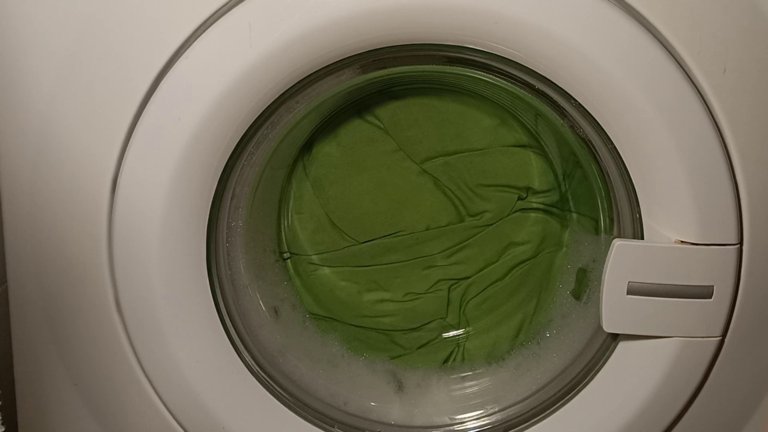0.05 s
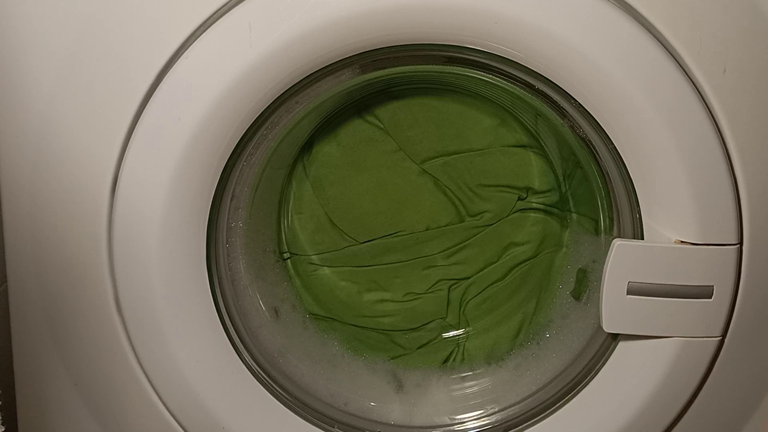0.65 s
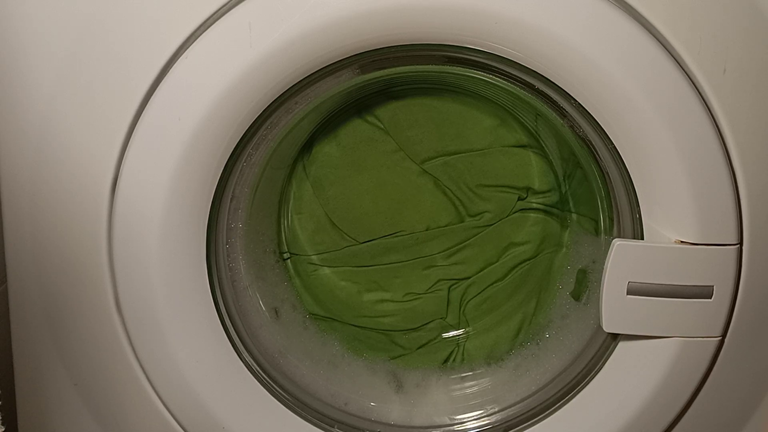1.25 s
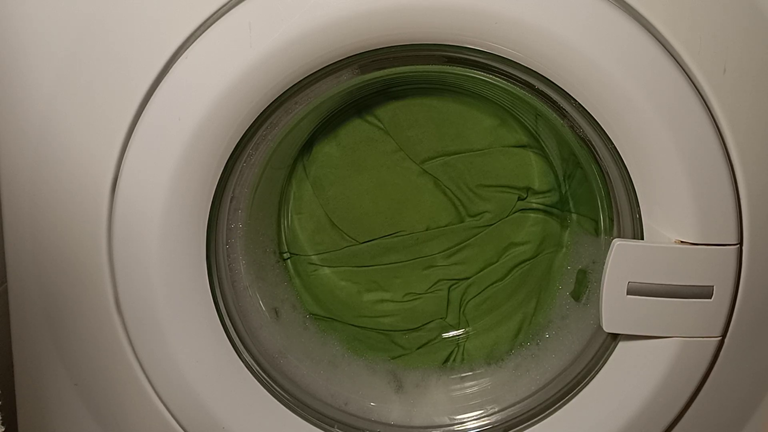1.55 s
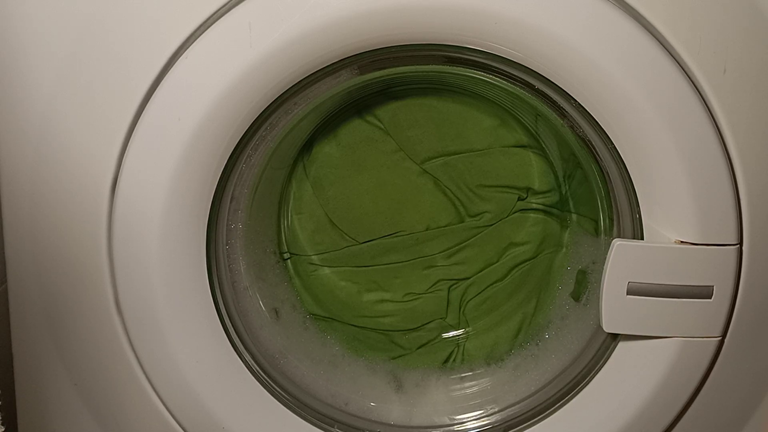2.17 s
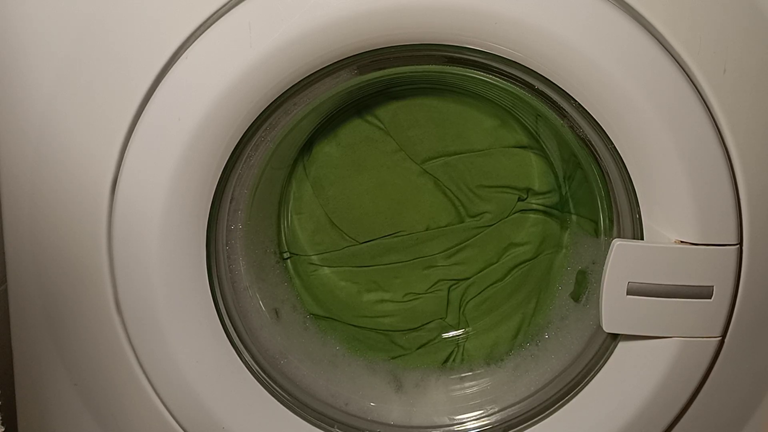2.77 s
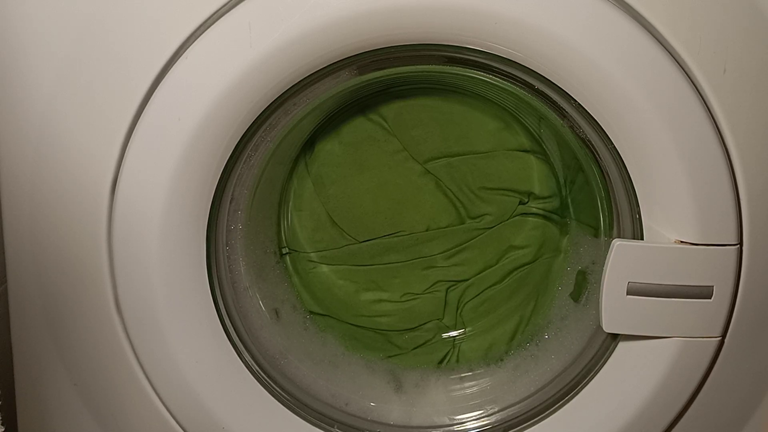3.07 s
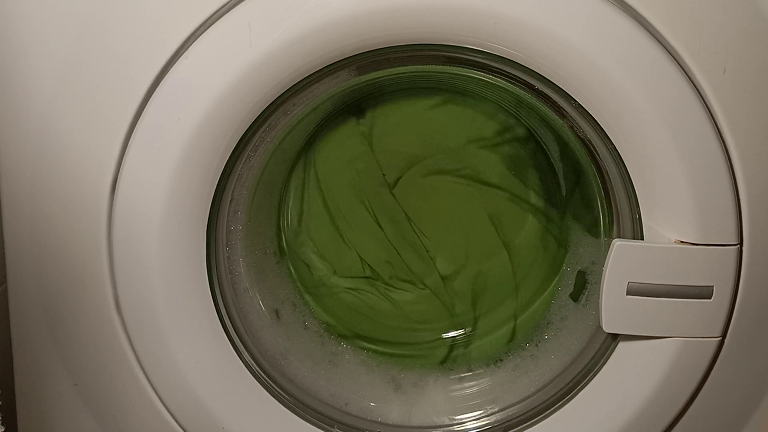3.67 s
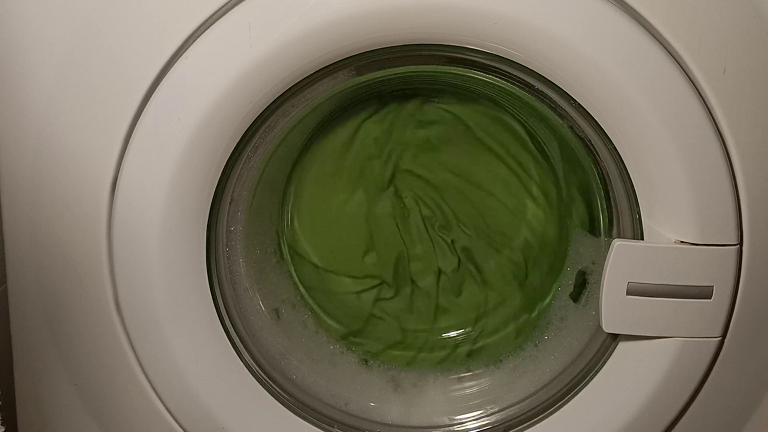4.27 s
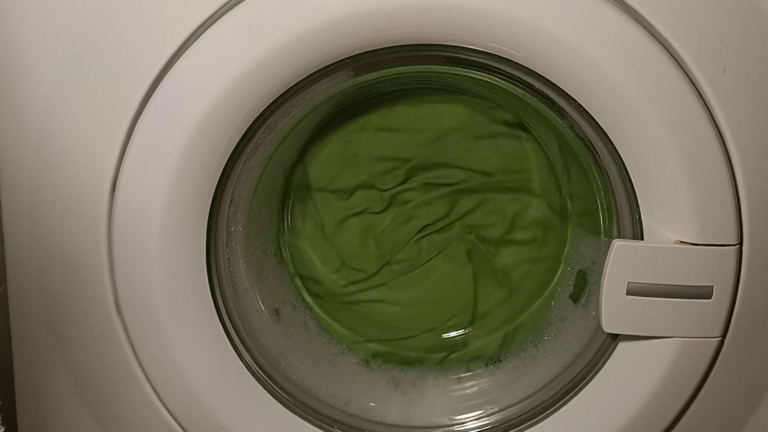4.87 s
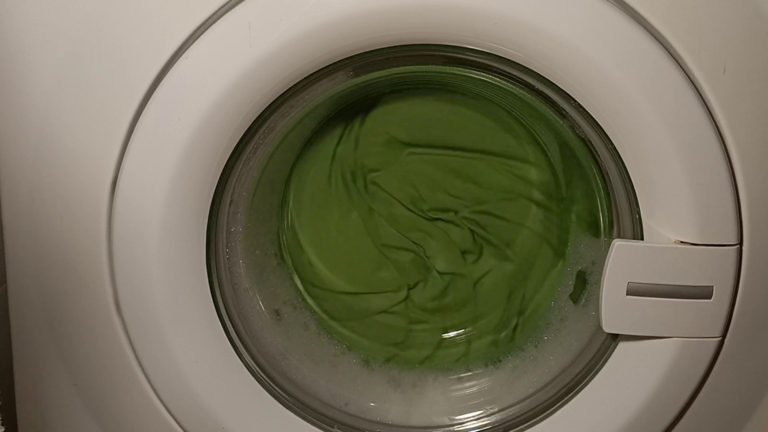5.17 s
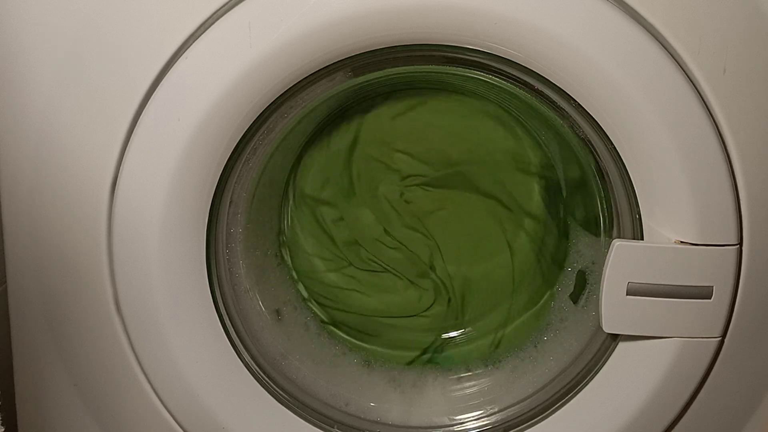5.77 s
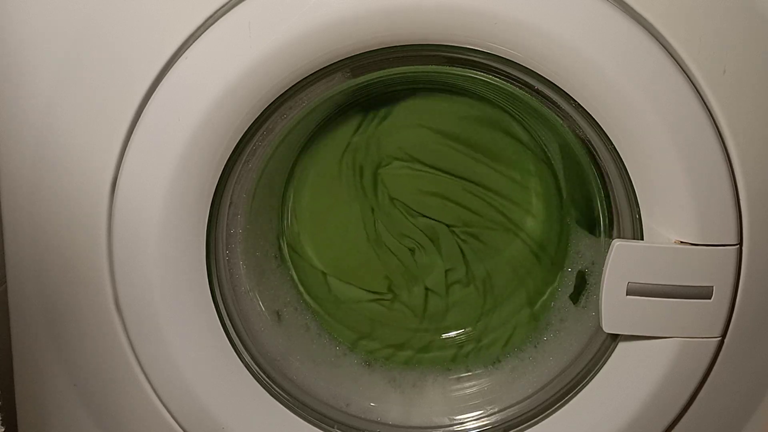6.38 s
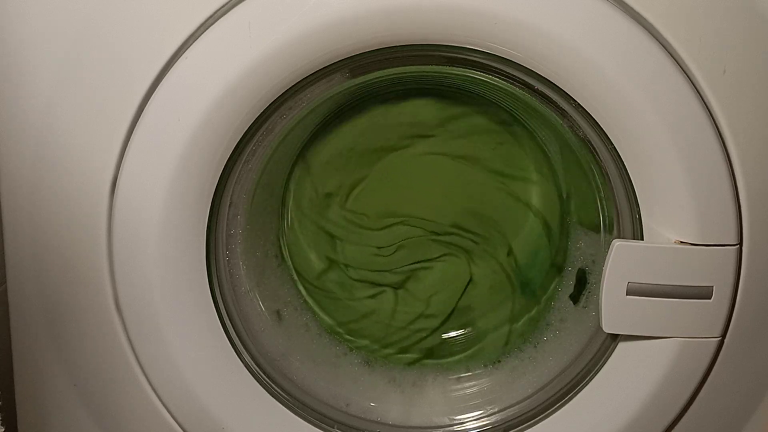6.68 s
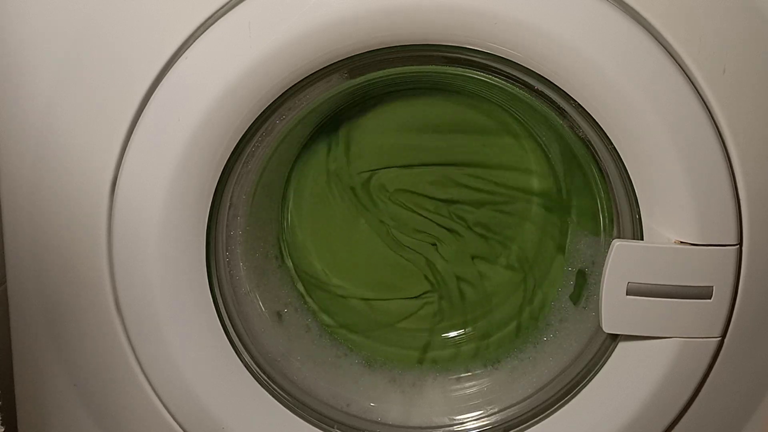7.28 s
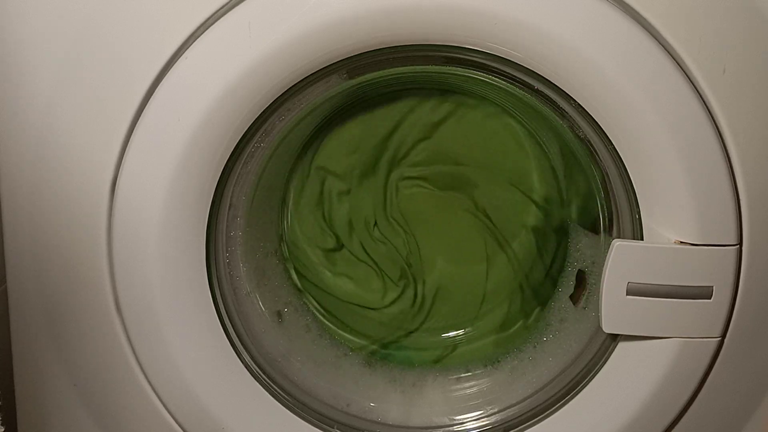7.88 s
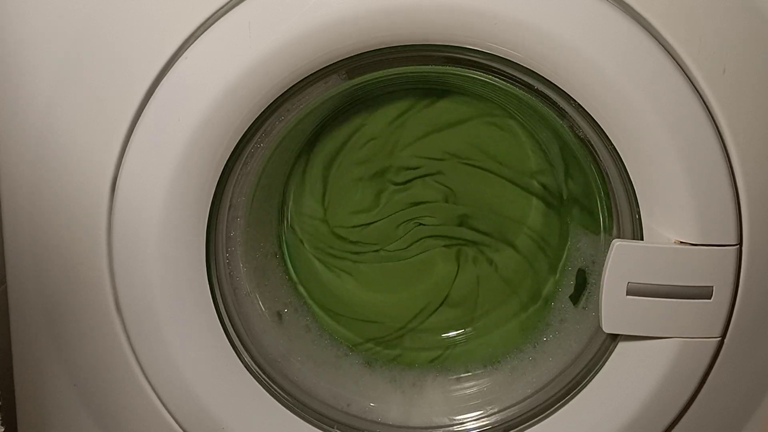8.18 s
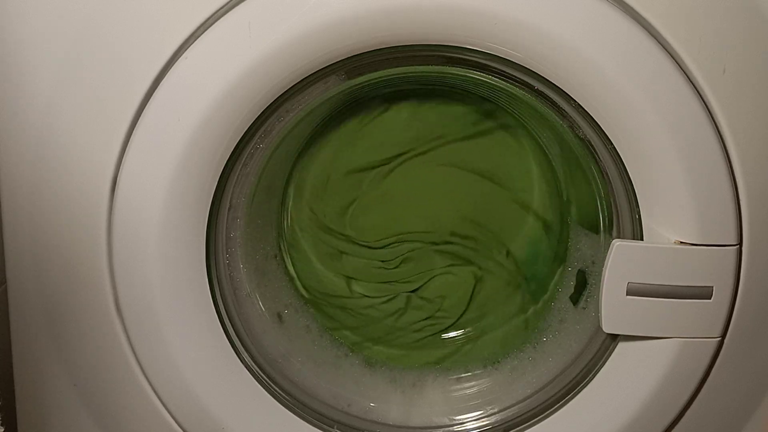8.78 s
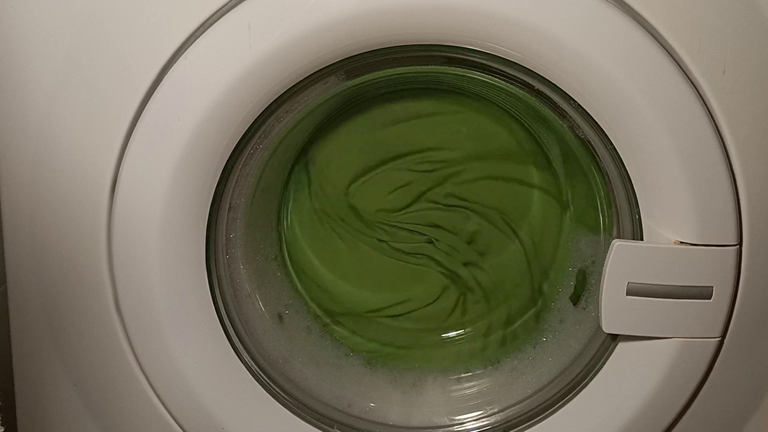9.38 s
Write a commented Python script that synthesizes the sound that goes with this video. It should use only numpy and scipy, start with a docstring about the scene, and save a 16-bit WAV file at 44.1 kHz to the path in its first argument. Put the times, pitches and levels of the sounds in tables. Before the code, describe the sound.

A front-loading washing machine runs throughout in a small room, with a low electric hum, a fluttering pump buzz and the steady rush of churning water. At 3 seconds the drum starts to turn: the hum swells, then rises and falls with the load, and a faint, thin motor whine joins. From about 4 seconds a soft hiss of water comes through the tumbling laundry in slow, gentle surges. From 7.7 seconds someone shifts close to the microphone, making several light clicks and a few soft, low thuds until about 8.8 seconds. Cloth swishes in two double strokes, at roughly 8.3 to 8.7 and 9.1 to 9.4 seconds, each with tiny high squeaks and the brief ringing of a thin, hard object. These close sounds have a short room echo. The machine keeps running to the end, at about 9.5 seconds.

```python
"""A front-loading washing machine hums and buzzes in a small room while its pump churns water.
At 3 s the drum starts to turn: the loaded motor swells the hum and its brushes add a thin whine.
Water then hisses through the tumbling laundry in slow surges.
From 7.7 s someone shifts close by, with a few ticks and soft thuds; from 8.3 s cloth swishes and
squeaks in two double strokes, setting a thin hard part ringing."""
import sys
import numpy as np
from scipy import signal
from scipy.fft import rfft, irfft, next_fast_len
from scipy.io import wavfile
from scipy.ndimage import uniform_filter1d, map_coordinates

SR = 44100
rng = np.random.default_rng(int(sys.argv[2]) if len(sys.argv) > 2 else 0)


def transcribe(u):
    """Save the signal u as a 16-bit wav file named by the first command-line argument.

    u: samples, shape (n,) or (channels, n), limited to [-1, 1]; the rate is SR.
    q: integer samples, one column per channel.
    """
    v = np.clip(np.atleast_2d(u).T, -1, 1)
    q = np.round(v * 32767).astype(np.int16)
    wavfile.write(sys.argv[1], SR, q)


N = 416304
TIME = np.arange(N) / SR
MAINS_HZ = 50
DRUM_START_S, SPIN_UP_S, LIFT_S, SETTLE_S = 3, 0.62, 1.33, 2.6


# Hum partials: mains order, level at usual load/dB, dB per dB of load, lift once settled/dB, waver/dB
HUM_PARTIALS = [(2, -48, 0.6, 0.1, 0.7), (4, -42.5, 1, -0.1, .8), (6, -46.5, 0, 1.7, 1.8)]

def motor_hum(mains_phase):
    """Magnetic forces tug the cabinet twice per mains cycle, harder under load."""
    load_db, settled = motor_load(), drum_ramp(SETTLE_S)
    out = np.zeros(N)
    for order, db, load_share, settled_db, waver_db in HUM_PARTIALS:
        rms = amp(db + load_share * load_db + settled_db * settled + waver_db * wobble(14))
        out -= np.sqrt(2) * rms * np.cos(order * mains_phase + 0.33 * wobble(14))
    return out


# Load envelope, as strength of hum: t/s, level/dB
LOAD_ENVELOPE = [(0.0, -43), (1.7, -43.5), (2.1, -45.5), (3.05, -42), (3.22, -39), (3.45, -35.5),
                 (3.95, -36.5), (4.15, -39.5), (4.8, -43.5), (5.4, -39.0), (5.65, -41.5), (6.1, -37),
                 (6.65, -38), (6.85, -41), (7.55, -40.5), (7.9, -43), (8.4, -38.5), (9.44, -38)]

def motor_load(usual_db=-40):
    """The motor's effort in lifting the laundry, in dB over its usual value."""
    return np.interp(TIME, *np.transpose(LOAD_ENVELOPE)) - usual_db


# Buzz partials: mains order (played rounded), level/dB, flutter/dB
PUMP_PARTIALS = [(3.006, -69.5, 3), (4.996, -56, 4.5), (6.99, -64, 2), (8.99, -59, 3), (10.02, -72.5, 2),
                 (12.99, -68, 4), (15.94, -71, 3), (18.97, -64, -1), (19.98, -66.5, 3.5), (23, -70, 1.5),
                 (27, -71.5, -5.5), (28.98, -74, -0.5), (35.06, -77, 0), (38.9, -80, 1), (45, -81.5, 0)]

def pump_buzz(mains_phase):
    """The pump's harmonics flutter with the water it bites."""
    out = np.zeros(N)
    for order, db, flutter_db in PUMP_PARTIALS:
        flutter = amp(flutter_db * wobble(22))
        tone = np.cos(round(order) * mains_phase + rng.uniform(0, 2 * np.pi))
        out += amp(db) * unit(flutter * tone)
    return out


# EQ of the churn outside the cabinet: f/Hz, gain/dB
CHURN_EQ = [(42, -21), (50, -7), (70, -12), (150, -14), (250, 2), (380, -1.5), (490, -5), (640, -4),
            (720, 0.5), (1020, -1), (1300, -8), (1600, -10.5), (2500, -16.5), (3900, -24), (5200, -45)]
# Panel and tub resonances, with one notch: f/Hz, width/Hz, gain/dB
PANEL_MODES = [(105, 25, 18), (200, 31, 16), (262.5, 9.4, 8.5), (288, 15, 11.5), (397.3, 19, 12.5),
               (424, 12, -4), (438, 9.9, 6), (685, 19, 4.5), (715, 18, 6), (747, 12, 2), (793, 14, 2),
               (880, 16, 7.5), (968, 50, 2.5), (1059, 34, 4), (1420, 66, 3.5), (1890, 80, 3.5),
               (2340, 100, 3)]

def water_churn(mains_phase, level_db):
    """Three pump vanes chop the water once each per turn; the turbulence rings the panels."""
    def cabinet(hz):
        panels_db = sum(db / (1 + (2 * (hz - centre) / width) ** 2) for centre, width, db in PANEL_MODES)
        crowd_db = 2.5 * ripple(hz, spacing_hz=13) * np.clip(hz / 900, 0, 1)  # modes crowd higher up
        return amp(along(CHURN_EQ, hz) + panels_db + crowd_db)

    chop = 1 + 0.057 * np.cos(3 * mains_phase) + 0.027 * np.cos(2 * mains_phase)
    body = filtered(grains(rate=4000, share=0.24) * chop, cabinet)
    return amp(level_db - 0.28 * wobble(7)) * unit(body)


# Swish cues: t/s, rise/s, fall/s, relative rub level/dB, relative hiss level/dB
CLOTH_STROKES = [(8.338, .19, .087, -46.5, -51), (8.611, 0.033, 0.079, -48, -59.5),
                 (9.07, 0.11, 0.16, -48, -56), (9.3, 0.059, 0.075, -52.5, -54)]
# EQ of the dull rub: f/Hz, gain/dB
RUB_EQ = [(300, -16), (700, -1.5), (1300, -1.5), (1700, -4.5), (2600, -4), (3800, -5), (5000, -25),
          (8000, -35)]
# EQ of the crisp hiss: f/Hz, gain/dB
HISS_EQ = [(2000, -25), (4500, -1), (5700, -2), (7000, 4), (8800, 5), (10300, -7), (12500, -9), (14500, -9),
           (15800, -11)]

def cloth_swishes(rub_gain_db, hiss_gain_db):
    """Fibres catch and slip: a dull rub and a crisp hiss, each growing with the stroke's speed."""
    out = np.zeros(N)
    rub = coloured(patchy(grains(rate=1100, share=0.38), depth_db=1), RUB_EQ)
    hiss = coloured(patchy(grains(rate=700, share=0.5), depth_db=3.5), HISS_EQ)
    for start, rise, fall, rub_db, hiss_db in CLOTH_STROKES:
        speed = np.interp(TIME, [start, start + rise, start + rise + fall], [0, 1, 0])
        out += amp(rub_db + rub_gain_db) * speed ** 0.76 * rub
        out += amp(hiss_db + hiss_gain_db) * speed ** 0.77 * hiss
    return out * amp(0.8 * wobble(90))


# Squeak cues: t/s, length/s, starting f/Hz, level/dB, pitch scatter/fraction
SQUEAK_CUES = [(8.385, 0.031, 4100, -48.5, 0.04), (8.433, .055, 4090, -47, 0.056),
               (9.158, 0.041, 3830, -52, .06), (9.203, 0.031, 4320, -43.5, 0.019),
               (9.295, .02, 4450, -60, 0.056)]

def cloth_squeaks(attack_s, release_s, sag_hz_per_s):
    """Ribbed cloth sings rough notes that sag as the sliding slows; two folds slide slightly apart."""
    out, t = np.zeros(N), np.arange(SR // 5) / SR
    for start, length, hz, db, scatter in SQUEAK_CUES:
        note = np.zeros(len(t))
        for fold in range(2):
            speed = 1 + scatter * wobble(2496, len(t)) + 0.012 * wobble(58, len(t))
            phase = 2 * np.pi * np.cumsum((hz - sag_hz_per_s * t) * speed) / SR
            partials = np.sin(phase) + amp(-14) * np.sin(2 * phase) + amp(-22) * np.sin(3 * phase)
            note += partials * amp(2.3 * wobble(222, len(t)))
        grip = np.clip(t / attack_s, 0, 1) * np.clip(1 - (t - length) / release_s, 0, 1)
        add(out, start, amp(db) * grip * unit(note))
    return out


# Ring cues: t/s, f/Hz, relative level/dB, t60/s
RING_CUES = [(8.506, 2330, -43.5, 0.34), (8.549, 2348, -50, 0.3), (8.63, 2335, -50, 0.38),
             (8.65, 3610, -60, 0.62), (8.66, 4870, -67, .7), (9.15, 2400, -47, .2), (9.201, 2728, -41, 0.2),
             (9.341, 2780, -56, .3), (9.37, 6840, -56, .2)]

def rings(gain_db, rise_s):
    """Cloth drags over a thin hard part: each ring swells, wavers and dies away."""
    out, t = np.zeros(N), np.arange(SR // 2) / SR
    phase_drift = 0.99 * wobble(120)
    for start, hz, db, t60 in RING_CUES:
        envelope = amp(db + gain_db - 60 * t / t60) * (1 - np.exp(-t / rise_s))
        waver = phase_drift[rng.integers(N - len(t)):][:len(t)]
        add(out, start, envelope * np.sin(2 * np.pi * hz * t + waver))
    return out


# Tick cues: t/s, relative level/dB
TICK_CUES = [(7.732, -44), (7.8276, -55), (8.2965, -48.5), (8.3607, -45.5), (8.3936, -51), (8.504, -50),
             (8.6235, -39), (8.6674, -45.5), (8.8104, -37)]

def ticks(gain_db, rise_s, t60_s):
    """Small hard parts touch with short, dry clicks."""
    out, t = np.zeros(N), np.arange(SR // 10) / SR
    for start, db in TICK_CUES:
        envelope = amp(db + gain_db - 60 * t / t60_s) * (1 - np.exp(-t / rise_s))
        add(out, start, envelope * rng.standard_normal(len(t)))
    click_eq = [(300, -6), (2200, 15.5), (5000, 3), (8000, 5), (11000, -8), (15000, -7)]  # f/Hz, gain/dB
    return filtered(out, lambda hz: amp(along(click_eq, hz)))


# Thud cues: t/s, f/Hz, relative level/dB
THUD_CUES = [(7.82, 58, -60), (8.18, 56, -60), (8.37, 58, -46), (8.65, 66, -43), (8.71, 54, -49)]

def thuds(gain_db, rise_s, t60_s):
    """Shifting weight gives soft, low bumps."""
    out, t = np.zeros(N), np.arange(SR // 2) / SR
    for start, hz, db in THUD_CUES:
        envelope = amp(db + gain_db - 60 * t / t60_s) * (1 - np.exp(-(t / rise_s) ** 2))
        add(out, start, envelope * np.sin(2 * np.pi * hz * t))
    return out


# EQ of the spray: f/Hz, gain/dB
SPRAY_EQ = [(800, -25), (2600, 4.5), (4000, 1), (5200, -5.5), (6900, 0.5), (7300, 1), (7700, -1.5),
            (8500, 0.5), (9600, -4.5), (10800, -12), (12300, -17), (14200, -13.5), (15800, -19)]

def water_spray(rest_db, turning_db, surge_db, surge_period_s):
    """Drops and foam fizz behind the door glass, louder once the laundry is lifted and drains in surges."""
    since_lifted = TIME - DRUM_START_S - LIFT_S
    drain_db = surge_db * np.cos(2 * np.pi * since_lifted / surge_period_s)
    level_db = rest_db + drum_ramp(LIFT_S) * (turning_db - rest_db + drain_db)
    fizz = filtered(grains(rate=3000, share=0.17), lambda hz: amp(2 * ripple(hz, spacing_hz=55.1)))
    return amp(level_db + 0.26 * wobble(12)) * coloured(fizz, SPRAY_EQ)


# The motor's singing resonances: f/Hz, width/Hz, gain/dB
WHINE_MODES = [(2626, 52, 2), (2770, 47, -4), (4165, 41, -6), (4240, 12, 0.5)]

def motor_whine(level_db, load_share):
    """The brushes of the running motor excite narrow resonances, more strongly under load."""
    def resonances(hz):
        return sum(amp(db) * 1j * hz * width / (centre ** 2 - hz ** 2 + 1j * hz * width)
                   for centre, width, db in WHINE_MODES)

    strength = drum_ramp(SPIN_UP_S) * amp(level_db + load_share * motor_load() + wobble(12))
    return strength * unit(filtered(rng.standard_normal(N), resonances))


# Reverb decay: f/Hz, t60/s
ROOM_DECAY = [(200, 1), (2500, 0.46), (12000, 0.34)]

def room(x):
    """Hard walls answer with a short tail, shorter in the treble."""
    hz, t, noise = signal.stft(rng.standard_normal(SR // 2), SR, nperseg=256)
    decay = amp(-60 * t / along(ROOM_DECAY, hz)[:, None])
    tail = signal.istft(noise * decay, SR, nperseg=256)[1]
    response = np.pad(tail, (SR // 200, 0)) / np.linalg.norm(tail)  # 5 ms pre-delay
    return signal.fftconvolve(x, response)[:N]


def drum_ramp(seconds):
    """0 at rest, easing up to 1 over the given seconds once the drum starts."""
    return np.sin(np.pi / 2 * np.clip((TIME - DRUM_START_S) / seconds, 0, 1)) ** 2


def grains(rate, share):
    """Tiny impacts, rate a second, carry a share of the power; the rest is smooth noise."""
    pops = (rng.random(N) < rate / SR) * rng.standard_normal(N)
    return np.sqrt(share) * unit(pops) + np.sqrt(1 - share) * rng.standard_normal(N)


def patchy(x, depth_db):
    """Folds open and close, so short-lived resonances come and go."""
    spectra = signal.stft(x, nperseg=512)[2]
    patches = uniform_filter1d(rng.standard_normal(spectra.shape), size=4, axis=0)
    patches = uniform_filter1d(patches, size=5, axis=1)
    return unit(signal.istft(spectra * amp(depth_db * unit(patches)), nperseg=512)[1][:N])


def ripple(hz, spacing_hz):
    """Crowded small resonances: a smooth random curve over frequency."""
    return map_coordinates(rng.standard_normal(4096), [hz / spacing_hz], order=2, mode="mirror")


def wobble(rate, size=N):
    """A smooth random curve, rate knots a second."""
    knots = rng.standard_normal(int(size * rate / SR) + 4)
    return map_coordinates(knots, [np.arange(size) * rate / SR], order=2)


def filtered(x, response):
    """Filter x by a gain function of frequency."""
    size = next_fast_len(N + 8192)
    return irfft(rfft(x, size) * response(np.fft.rfftfreq(size, 1 / SR)), size)[:N]


def coloured(x, eq):
    """x through an EQ curve, at rms 1."""
    return unit(filtered(x, lambda hz: amp(along(eq, hz))))


def along(points, hz):
    """Read (f/Hz, value) points on a log frequency axis."""
    knots_hz, values = np.transpose(points)
    return np.interp(np.log(hz + 1), np.log(knots_hz + 1), values)


def amp(db):
    """Decibels to gain."""
    return 10 ** (np.asarray(db) / 20)


def unit(x):
    """Scale to rms 1."""
    return x / np.sqrt(np.mean(x ** 2) + 1e-20)


def add(track, start_s, sound):
    """Mix a sound into the track at its cue."""
    part = track[round(start_s * SR):][:len(sound)]
    part += sound[:len(part)]


def scene():
    """Mono mix: the machine on slightly drifting mains, close movements with reverb, dry thuds."""
    mains_phase = 2 * np.pi * np.cumsum(MAINS_HZ + 0.01972 * wobble(2.034)) / SR
    machine = motor_hum(mains_phase) + pump_buzz(mains_phase)
    machine += motor_whine(level_db=-67.5, load_share=0.52)
    machine += water_churn(mains_phase, level_db=-47)
    machine += water_spray(rest_db=-74, turning_db=-67.5, surge_db=1.5, surge_period_s=2.6)
    foley = cloth_swishes(rub_gain_db=0.1, hiss_gain_db=-1.5)
    foley += cloth_squeaks(attack_s=0.012, release_s=0.019, sag_hz_per_s=3450)
    foley += ticks(gain_db=-10, rise_s=0.0011, t60_s=0.1)
    foley += rings(gain_db=1, rise_s=0.004)
    bumps = thuds(gain_db=8, rise_s=0.031, t60_s=0.35)
    return (machine + foley + amp(-4.5) * room(foley) + bumps)[None]


def record(dry):
    """A quick fade at each end and a brick-wall high cut."""
    fade_s, top_hz = 0.006, 15750
    fade = np.sin(np.pi / 2 * np.clip(np.minimum(TIME, TIME[::-1]) / fade_s, 0, 1)) ** 2
    return filtered(dry[0] * fade, lambda hz: hz < top_hz)[None]


dry = scene()
out = record(dry)
transcribe(out)
```